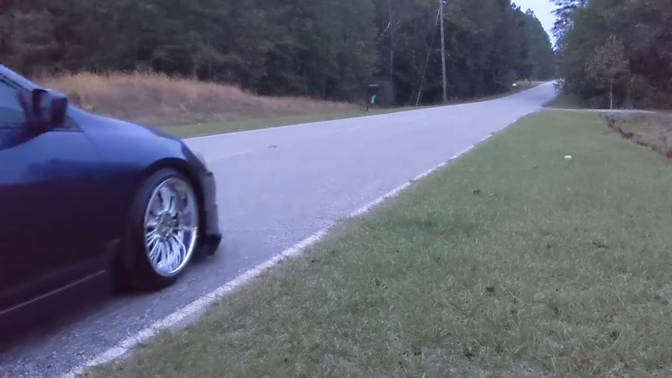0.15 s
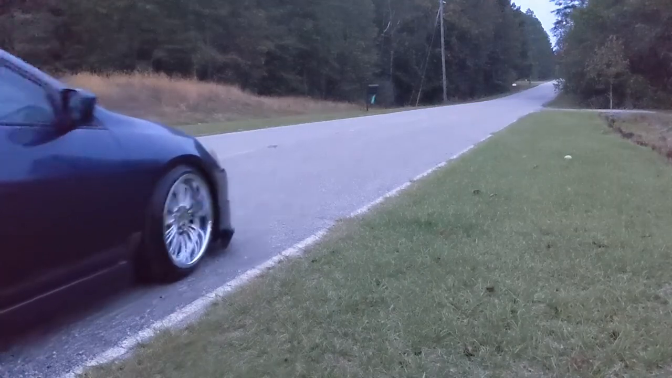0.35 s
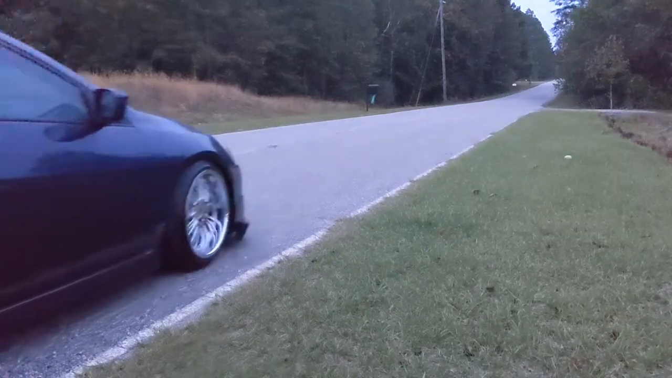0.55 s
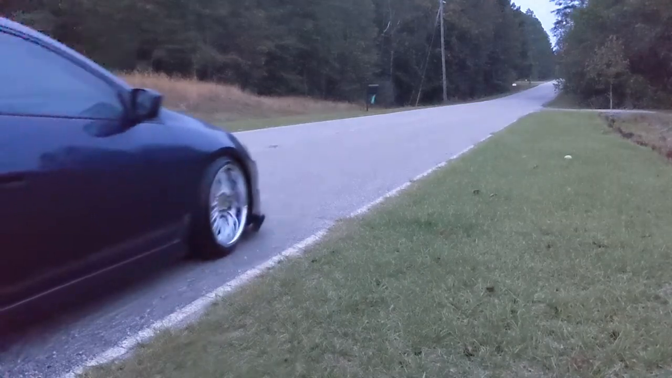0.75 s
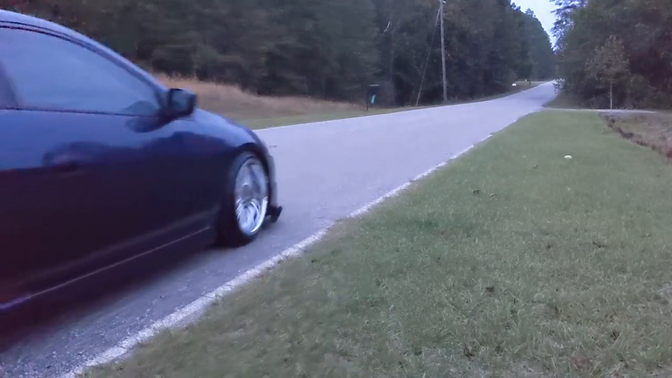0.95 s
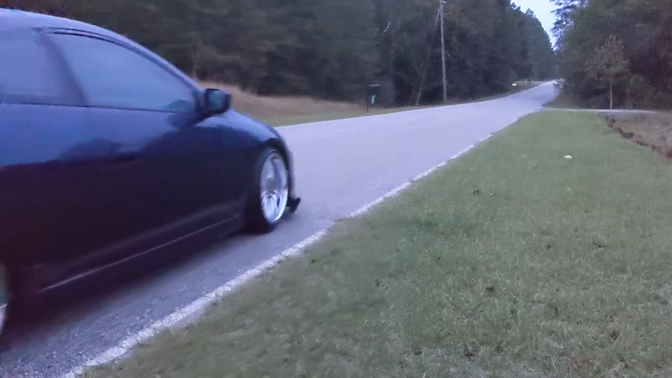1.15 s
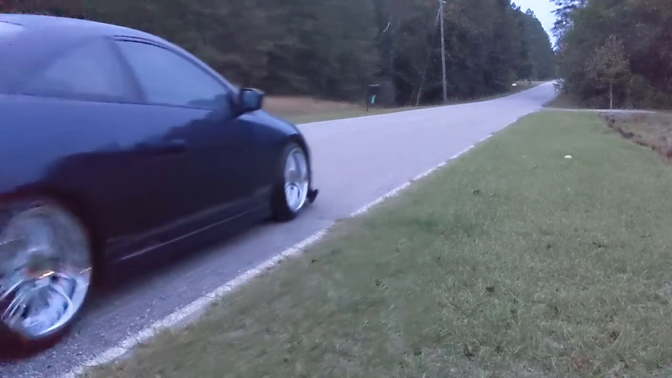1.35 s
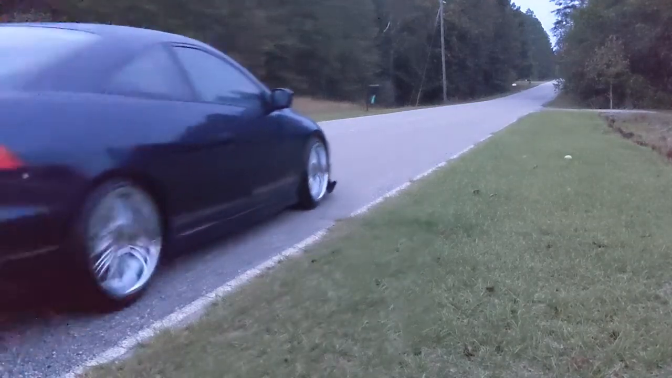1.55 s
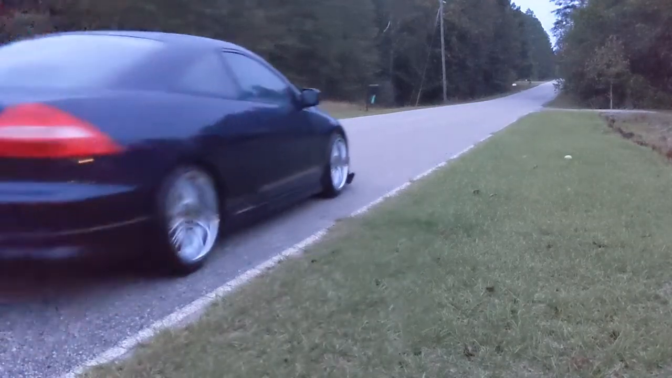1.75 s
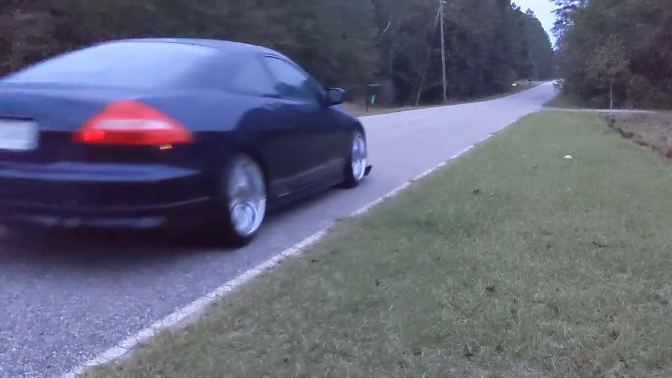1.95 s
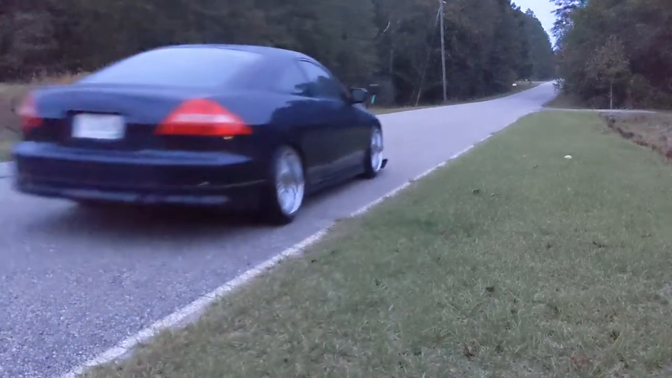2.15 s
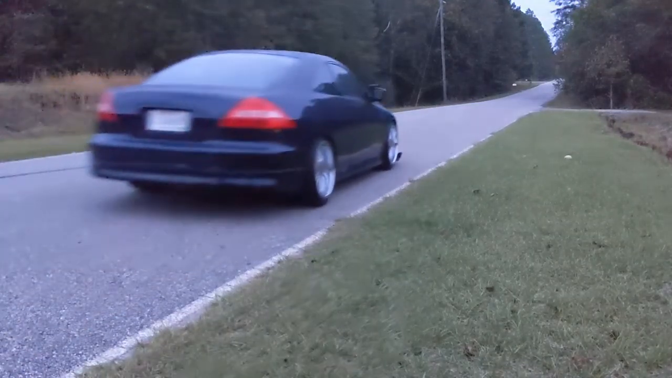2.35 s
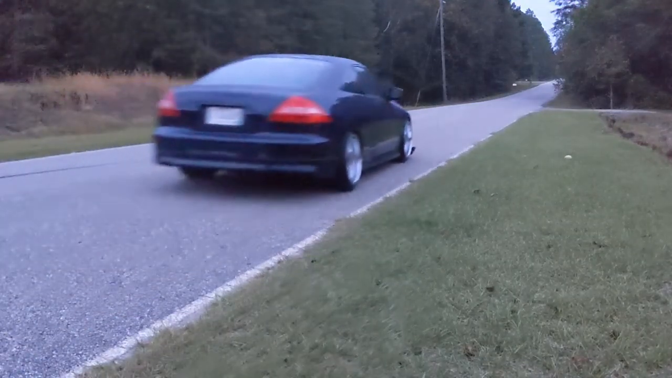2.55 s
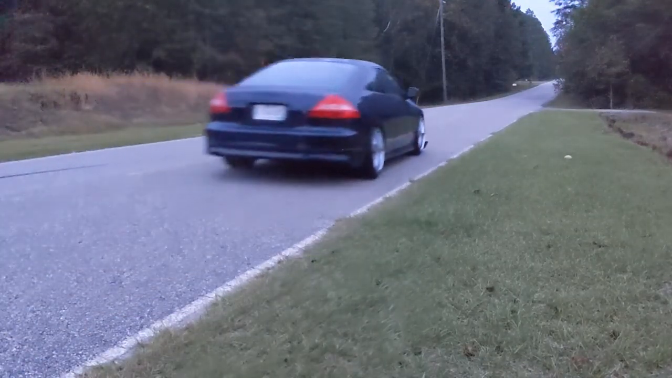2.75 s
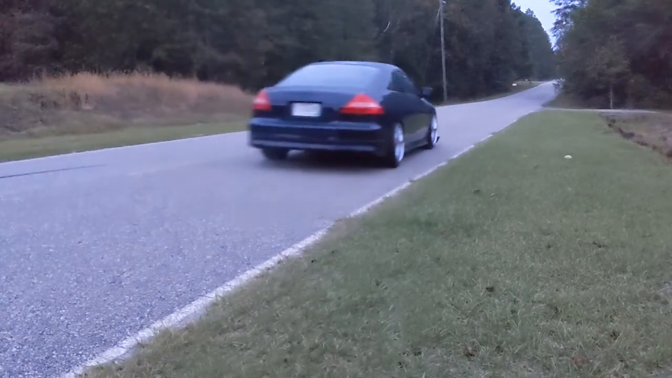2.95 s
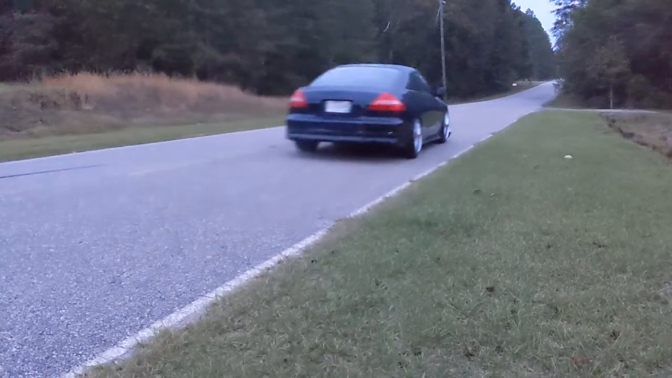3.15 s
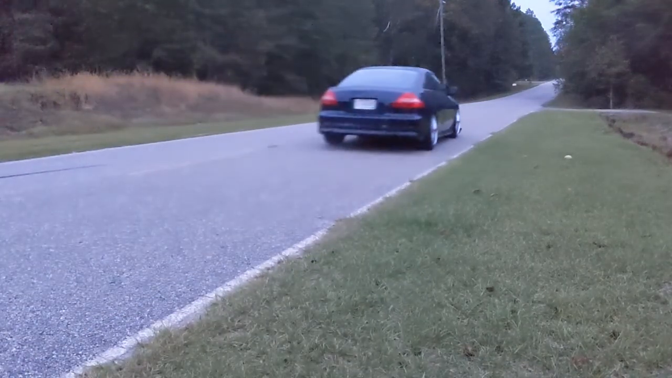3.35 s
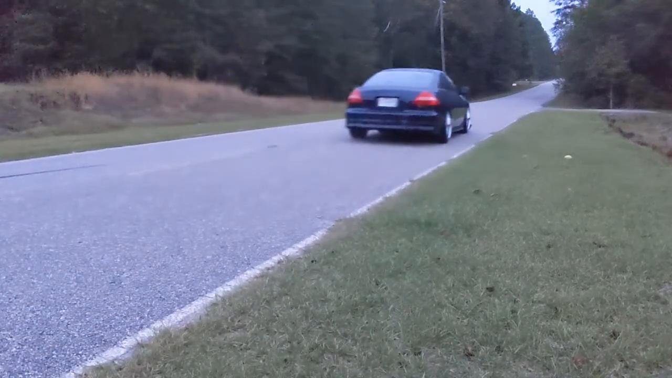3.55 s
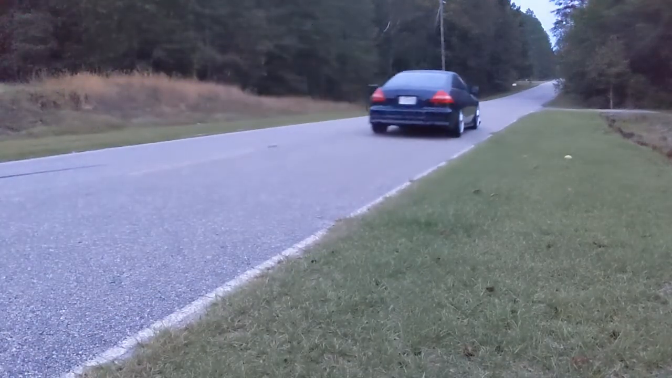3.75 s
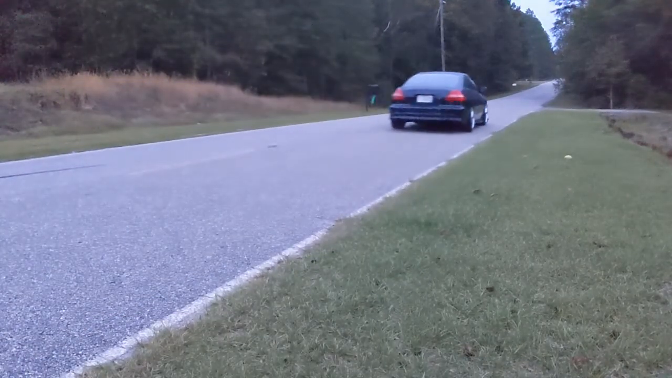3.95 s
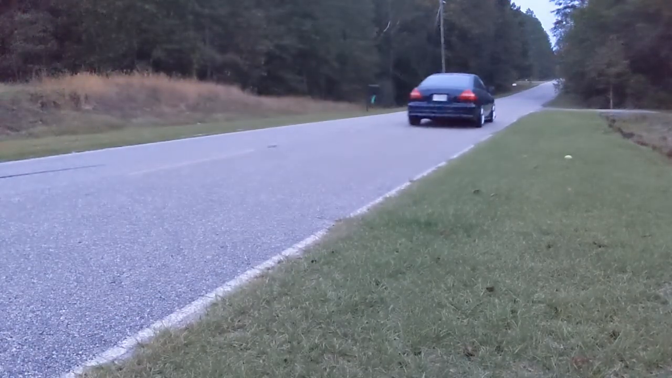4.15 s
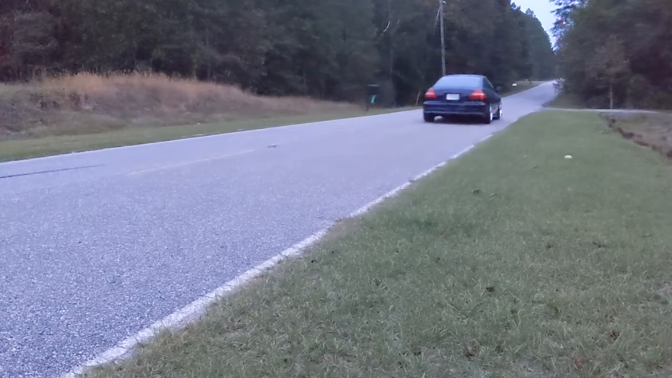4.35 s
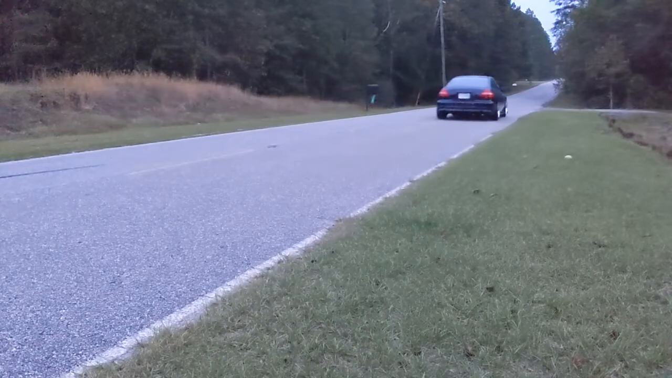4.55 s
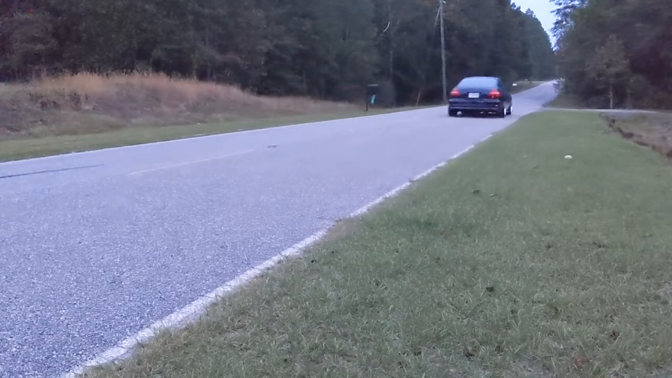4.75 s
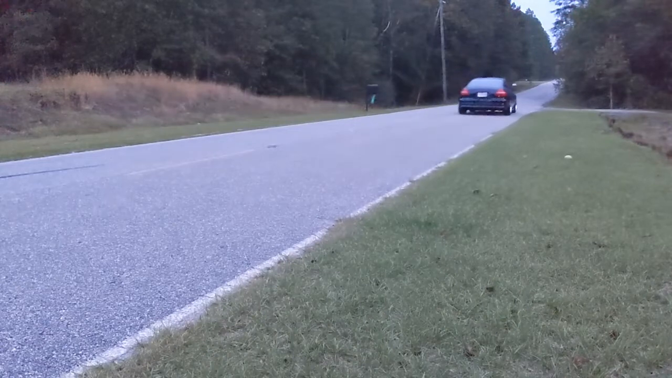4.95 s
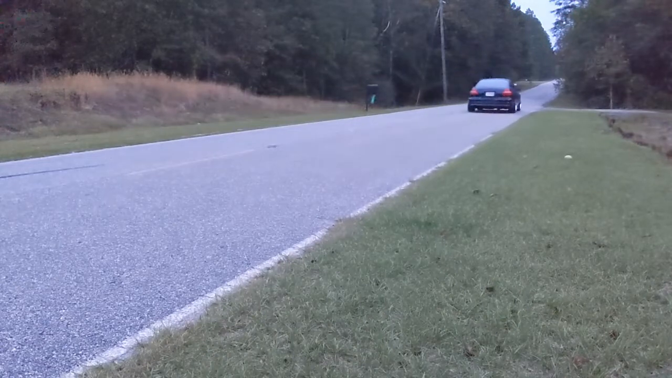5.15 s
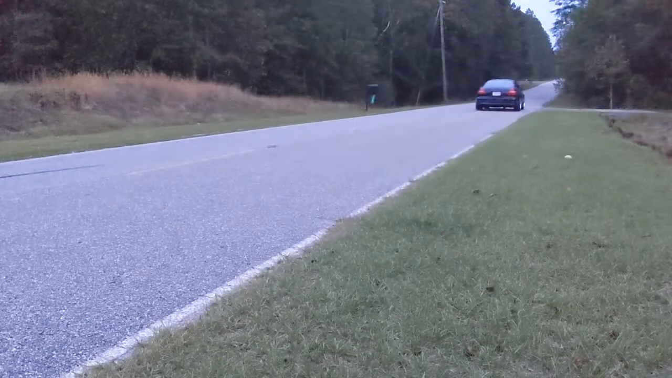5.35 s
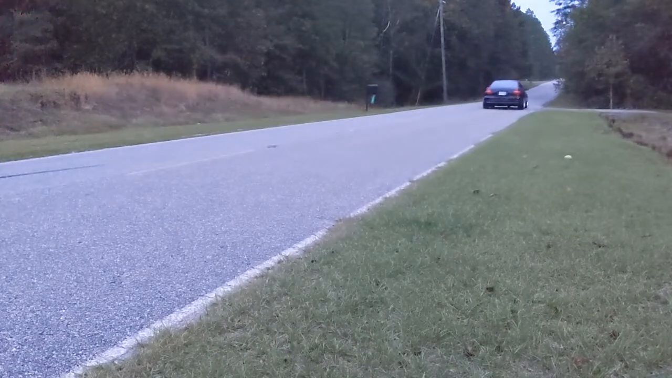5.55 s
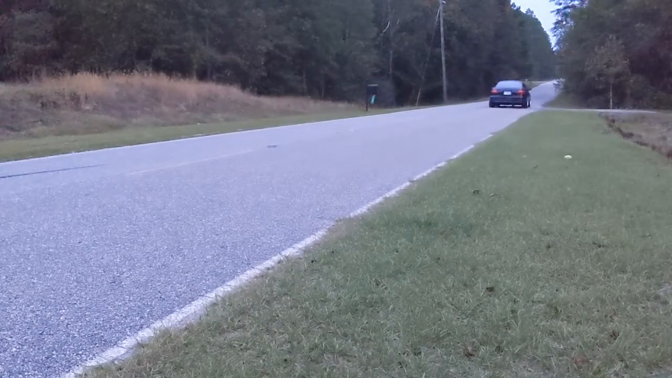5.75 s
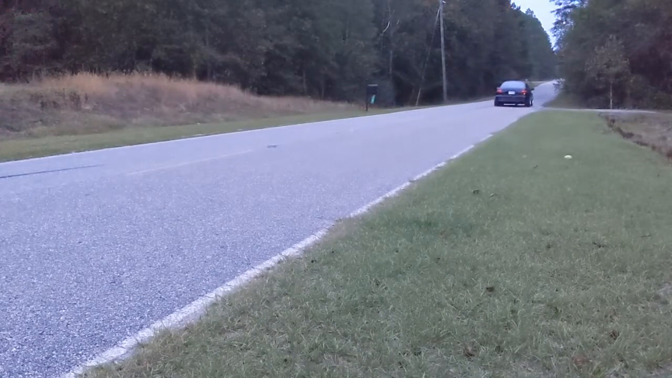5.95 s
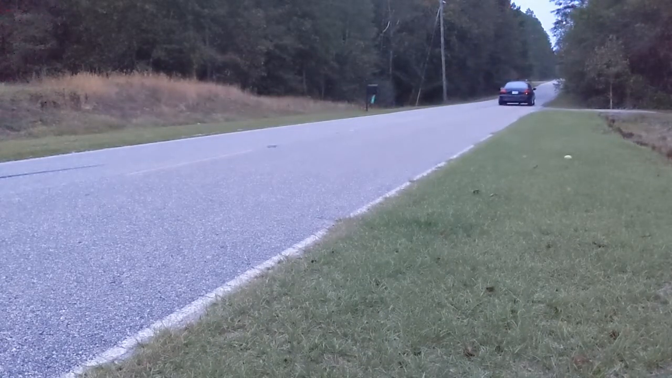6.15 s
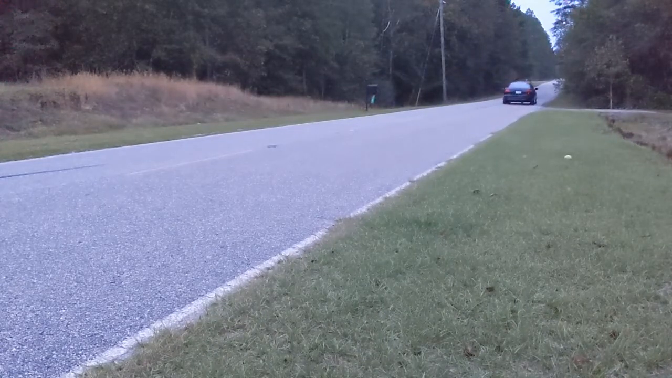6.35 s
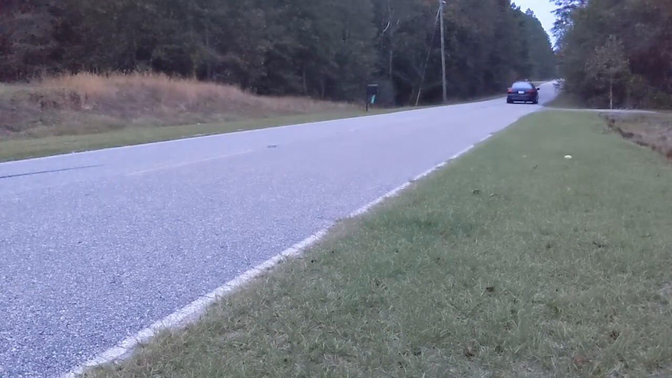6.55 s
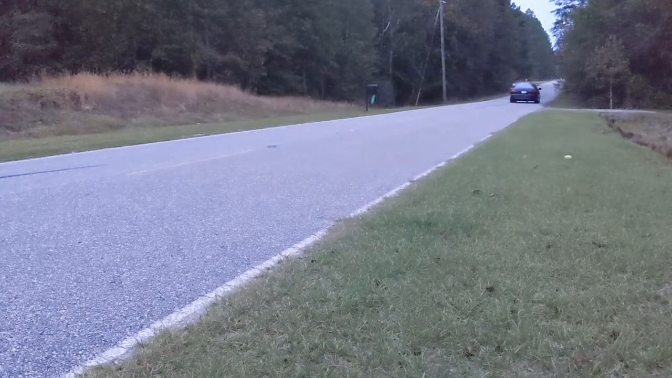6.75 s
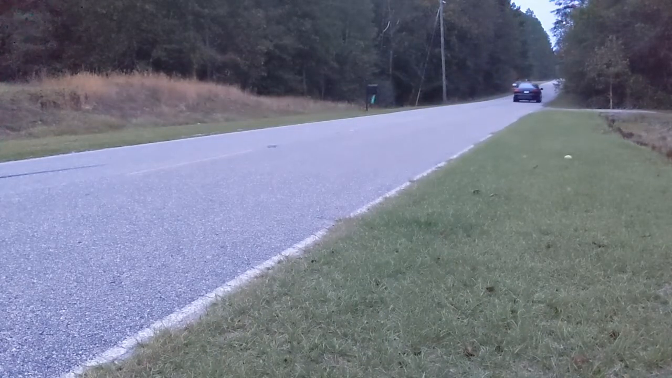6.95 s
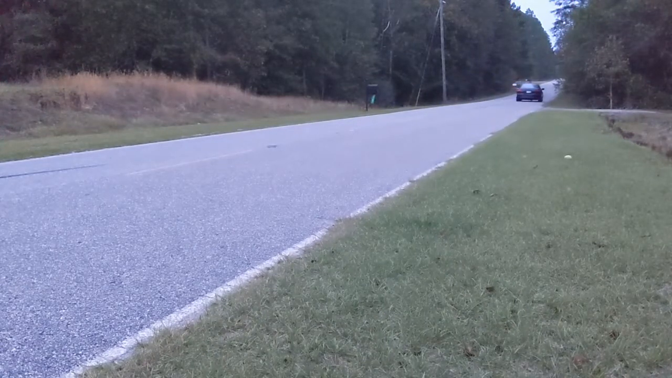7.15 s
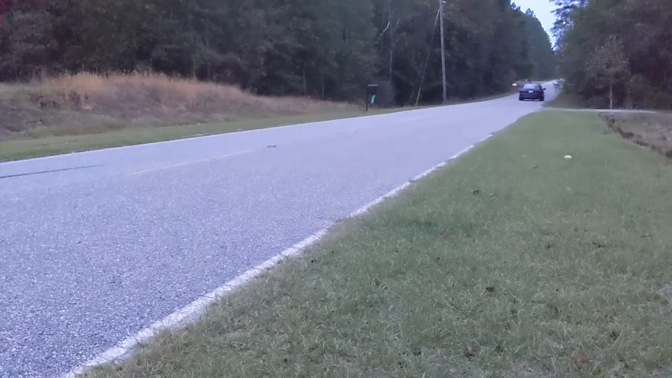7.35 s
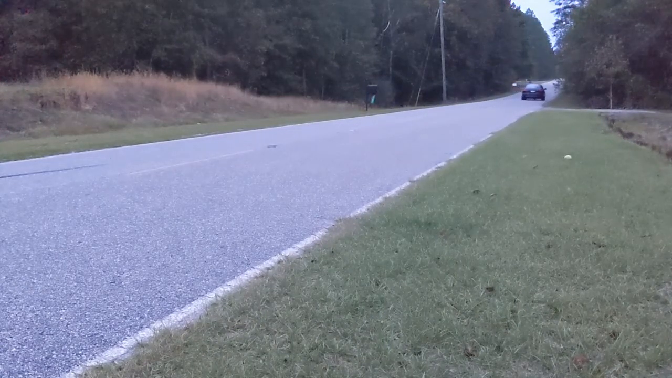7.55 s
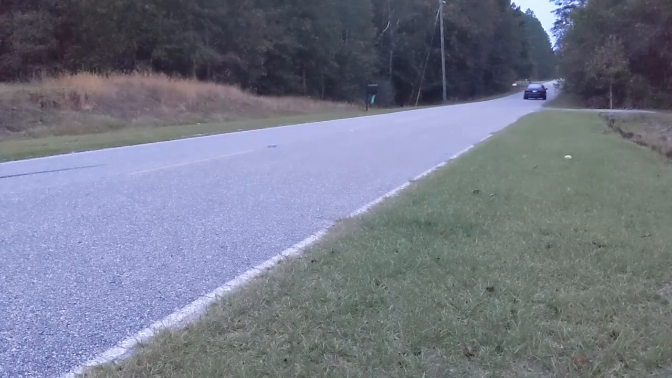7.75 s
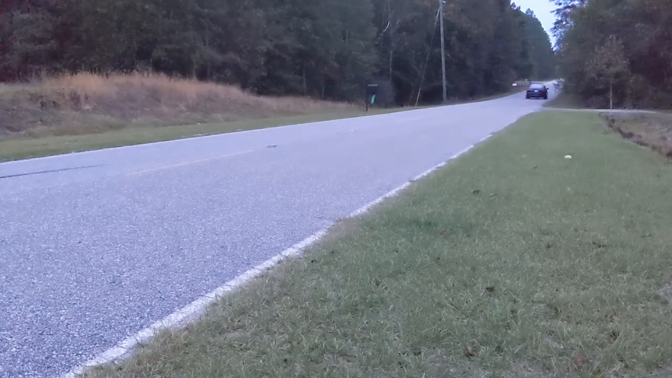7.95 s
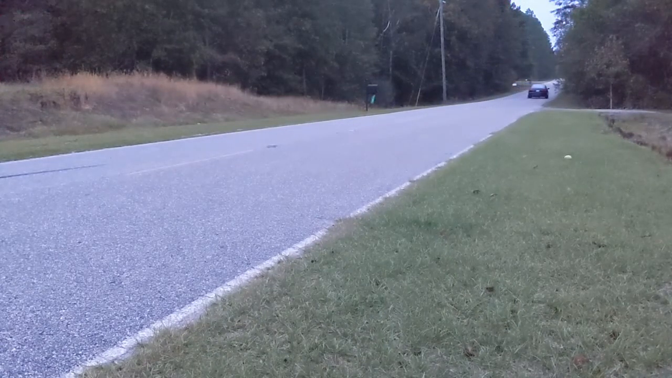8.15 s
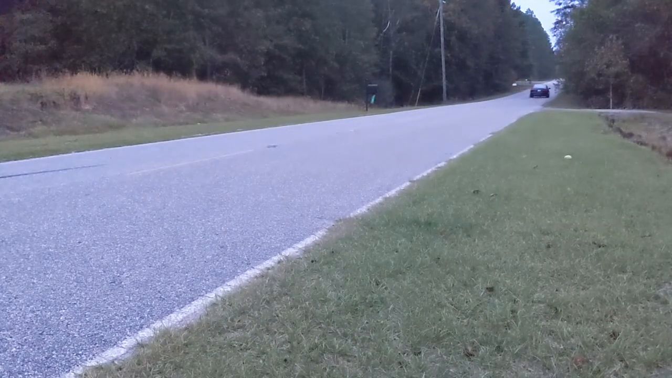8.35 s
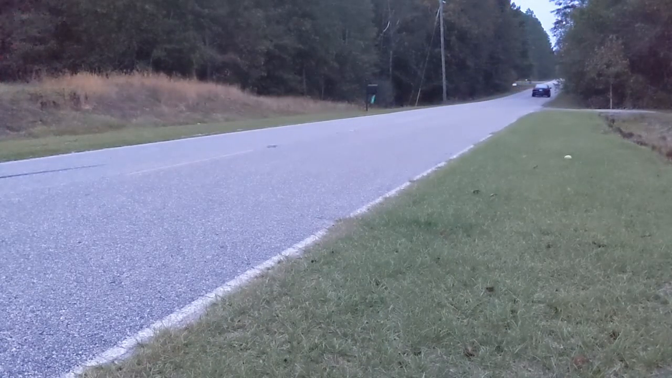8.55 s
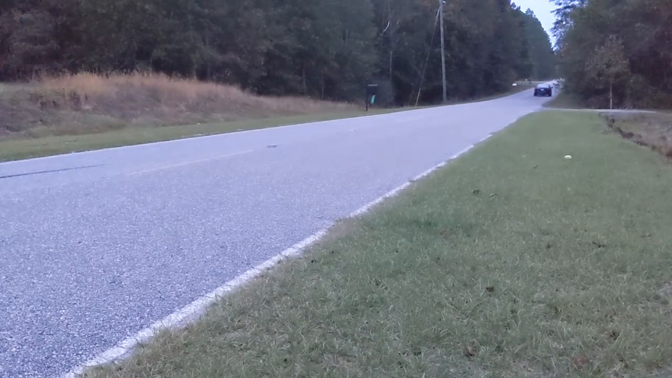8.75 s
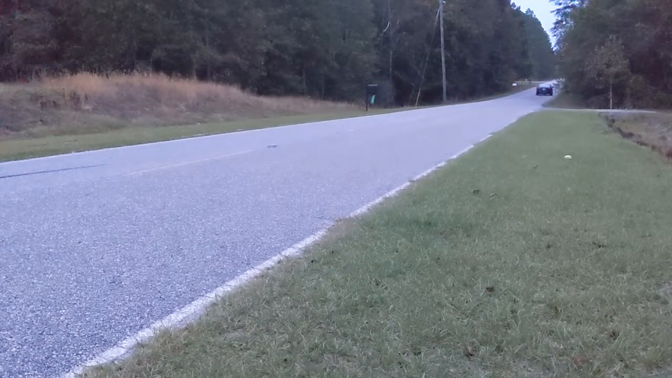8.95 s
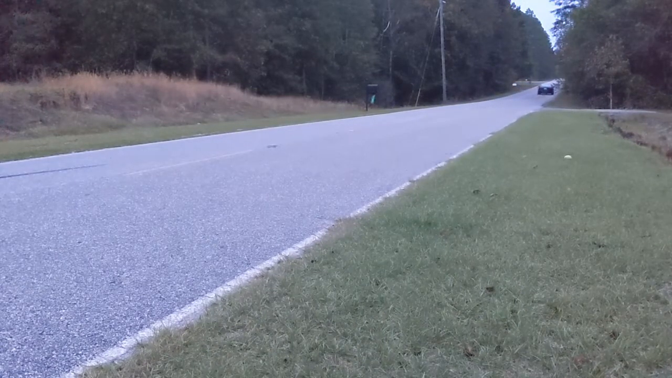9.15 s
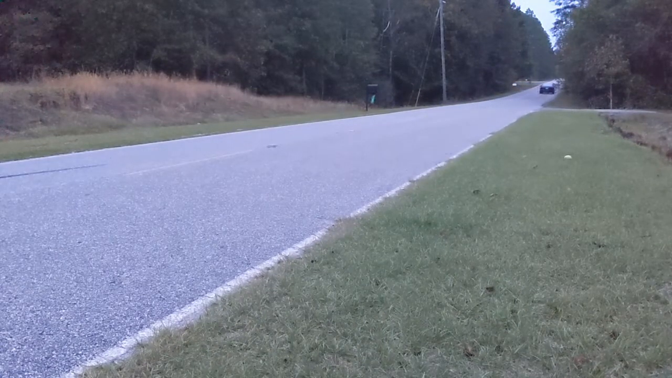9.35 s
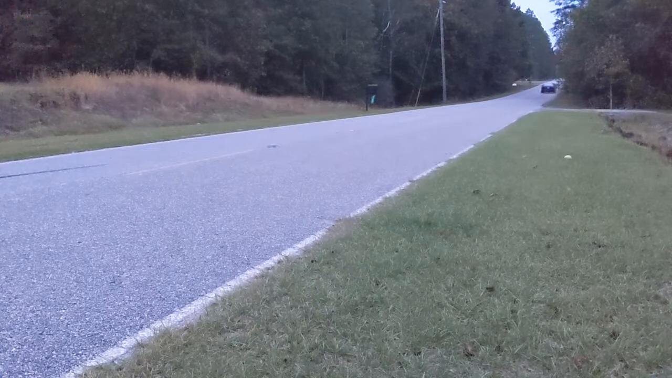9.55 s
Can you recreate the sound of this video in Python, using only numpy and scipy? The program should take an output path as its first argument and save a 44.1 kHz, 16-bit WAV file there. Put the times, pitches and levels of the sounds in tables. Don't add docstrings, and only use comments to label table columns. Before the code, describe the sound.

Close beside the road, a car slips its clutch, accelerates hard from left to ahead, lifts, changes gear and drives off growling.

```python
import sys
import numpy as np
from scipy import signal
from scipy.io import wavfile
from scipy.ndimage import uniform_filter1d, map_coordinates

SR = 44100
rng = np.random.default_rng(int(sys.argv[2]) if len(sys.argv) > 2 else 0)


def generate_wav(signal):
    frames = np.transpose(np.atleast_2d(signal))
    scaled = np.clip(frames, -1, 1) * 32767
    pcm = np.round(scaled).astype(np.int16)
    wavfile.write(sys.argv[1], SR, pcm)


def volts(x):
    e = np.asarray(x, float) / 20
    return 10 ** e


N = 423801
T = np.arange(N) / SR
STEP = 10
SLOW = T[::STEP]

# [t/s, firing rate/Hz, exhaust effort/dB]
REVS = [(0.0, 68.3, -20.0), (0.22, 71.86, -20.5), (0.55, 69.1, -21.5), (1.1, 42.98, -22.5),
        (1.32, 38.5, -20), (1.5, 41.07, -20.5), (2.45, 74.03, -16), (3.05, 97.14, -18),
        (3.45, 120.6, -21.5), (4.28, 161.2, -21.5), (5.2, 207.1, -23.2), (5.73, 229.1, -29),
        (5.99, 221.2, -37.5), (6.47, 190.4, -35.5), (6.6, 146.4, -34.5), (6.88, 169.6, -27.5),
        (7.7, 175.1, -29), (9.61, 237.8, -30)]
# [t/s, level/dB]
JET = [(0, -3.5), (.6, -3.5), (1.3, -6), (2.05, -1.5), (2.6, 2), (4.5, 2.5), (5.5, 2.5), (6.32, 0.5),
       (6.73, -4), (6.81, 1), (6.96, 6.5), (7.08, 2.5), (7.14, -3.5), (7.44, 1), (8.6, 2.5), (9.5, 4),
       (9.61, 4)]


def evened(x):
    return x / np.sqrt(np.mean(x ** 2) + 1e-20)


def read(points, hz):
    f, value = np.transpose(points)
    return np.interp(np.log(hz + 1), np.log(f + 1), value)


def curves(rows, t=T):
    s, *columns = np.transpose(rows)
    return [np.interp(t, s, c) for c in columns]


def bump(x, centre, width, height):
    return height * np.exp(-((x - centre) / width) ** 2)


def wander(per_s, t=SLOW):
    values = rng.standard_normal(int(N / SR * per_s) + 4)
    return evened(map_coordinates(values, [t * per_s], order=3))


def motion(t):
    # [t/s, speed/(m/s)]
    away = [
        (1.5, -2),
        (3, 10.5),
        (5, 21),
        (8, 24.5),
    ]
    speed = np.maximum(curves(away, t)[0], 0)
    return speed, np.log10(1 + np.cumsum(speed) * (t[1] - t[0]) / 3)


def engine():
    # [t/s, half width/s, shift/Hz]
    sags = [
        (1.85, .2, 1.02),
        (3.36, .14, 1.2),
        (6.709, .089, -18),
        (6.961, .038, -8),
        (7.233, .124, -13),
    ]
    hz = curves(REVS, SLOW)[0] + sum(bump(SLOW, *row) for row in sags)
    hz = hz * (1 + .002 * wander(25.0))
    return hz, np.cumsum(hz) * STEP / SR


def muffler_db(heard_hz, speed, decades, beside):
    # [f/Hz, level/dB]
    passed = [(31.5, -18), (65, -22), (109.5, -5), (158.7, -1.5), (315, -4.5), (344, -8.5), (585, -13),
              (1250, -23)]
    # [f/Hz, relative width, level/dB]
    chambers = [(117, 0.11, 2.5), (137, 0.039, 2.5), (215, 0.059, 0.7), (248, 0.023, -3.8),
                (305.7, 0.05, 3), (342, 0.013, -2.5), (414, 0.053, -4), (437.6, 0.022, -6.5),
                (509, 0.02, -6), (580, 0.09, -2.5), (647, 0.038, -14), (730, 0.019, -6.5)]
    # [f/Hz, relative width, level/dB]
    under_car = [(68.5, 0.12, 8), (110.5, 0.11, -5.5), (196.4, 0.04, -23), (206.6, 0.15, 5), (450, 0.23, 2)]
    # [f/Hz, relative width, level/dB]
    notch = (195.7, 0.056, -12)
    speed, decades, beside = speed[::STEP], decades[::STEP], beside[::STEP]
    f = heard_hz[::STEP] * (1 + speed / 343)

    def bell(hz, width, db):
        return bump(np.log(f / hz), 0, width, db)

    db = read(passed, f) + sum(bell(*row) for row in chambers)
    db += beside * sum(bell(*row) for row in under_car)
    db += -30 * np.maximum(np.log2(f / 620), 0) * np.clip((decades - 1) / .3, 0, 1)
    cliff_db = -7 * np.clip((f - 310) / 20, 0, 1)
    db += np.clip(1 - .024 * speed, 0, 1) * (bell(*notch) + cliff_db)
    return np.interp(SLOW, SLOW[::STEP], db)


def exhaust_orders(hz, turns):
    # [f/Hz, level/dB]
    pipe = [(30, -21), (70, -4), (150, -2), (310, 6.5), (350, -13), (480, -13), (560, -26), (900, -25),
            (1400, -34.5)]
    firing_db = [2, -6.5, -9.5, -11.5, -17.5, -22.5]
    cylinder_db = [0, -1.1, -1.1, 0, -1.6, 0, 0, 1.5, -6, 0, -3.7, 0.5]
    # [t/s, half width/s, level/dB]
    lift = [
        (5.83, .15, -9),
        (6.3, .2, 6),
    ]
    # [t/s, half width/s, level/dB]
    nulls = [
        (6.02, .035, -24),
        (6.51, .02, -5),
    ]
    effort_db = curves(REVS, SLOW)[1]
    speed, decades = motion(SLOW)
    beside = np.clip((1.8 - SLOW) / .3, 0, 1)
    uneven_db = -45 + .1 * (effort_db + 24) - 5 * decades - 7 * np.clip((1.9 - SLOW) / .3, 0, 1)
    bank_db = -4.0 * np.clip((70 - hz) / 25, 0, 1) - .49 * (effort_db + 24)
    out = np.zeros(len(SLOW))
    for sixth in range(3, 85):
        k = sixth / 6
        f = k * hz
        if sixth % 6 == 0:
            db = effort_db + muffler_db(f, speed, decades, beside)
            db += firing_db[min(sixth // 6, 6) - 1] - 2.5 * max(k - 6, 0)
            thin = np.minimum((f - 430) / 60, 1 - (k > 4.5) * (f - 640) / 150)
            db += -5.5 * (k > 3.5) * (1 - beside) * np.clip(thin, 0, 1)
            blur = np.clip((f - 420) / 150, 0, 1) * np.clip((130 - hz) / 40, 0, 1)
            start = np.pi + 1.1 - .9 * (f / 330) ** 2 + .6 * blur * wander(20.0)
            start += (bump(f, 215, 40, 1.3) - 1.8) * beside
        elif sixth > 45 or sixth > 11 and sixth % 3:
            continue
        else:
            if sixth in (3, 9):
                db = effort_db + muffler_db(f, speed, decades, beside) + bank_db
                db += -18 + sum(bump(SLOW, *row) for row in lift) if sixth == 3 else -22
            elif sixth % 3 == 0:
                db = uneven_db + read(pipe, f) + 3.0 - 0.82 * k
            else:
                db = uneven_db + read(pipe, f) + cylinder_db[sixth] - 13.5 * abs(np.log2(k / 0.95))
            start = 2 * np.pi * rng.random() + .4 * wander(3.0) + .12 * k * wander(16.0)
        flutter_db = 3.0
        if sixth in (6, 12, 18, 24):
            flutter_db = .4
        elif sixth in (3, 9, 30, 36, 42, 48):
            flutter_db = 1.2
        breaks_up = (f > 480) & (sixth in (18, 24, 30, 36))
        flutter_db = np.where(breaks_up, 2.5, flutter_db) * wander(7.0)
        tone = np.cos(2 * np.pi * k * turns + start) * (f < 1500)
        out += np.sqrt(2) * volts(db + flutter_db) * tone
    out *= volts(sum(bump(SLOW, *row) for row in nulls))
    return signal.resample_poly(out, STEP, 1, window=("kaiser", 10), padtype="reflect")[:N]


def noise(near, far, patchy_db, gone=((3.0, 0), (7.2, 1)), size=1024):
    # [f/Hz, likeness]
    likeness = [(100, 0.83), (600, 0.76), (1200, 0.75), (2500, 0.72), (5000, 0.36), (10000, 0.074)]
    frames, hz = 4 * N // size + 5, np.fft.rfftfreq(size, 1 / SR)
    a, b, c, d, patches = rng.standard_normal((frames, len(hz), 5), dtype=np.float32).T
    patches = uniform_filter1d(patches, size=10, axis=0)
    patches = evened(uniform_filter1d(patches, size=10, axis=1))
    share = np.clip(curves(gone, np.arange(frames) * size / 4 / SR)[0], 0, 1)
    colour = volts(np.outer(read(near, hz), 1 - share) + np.outer(read(far, hz), share))
    colour /= np.sqrt((colour ** 2).mean(0))
    same = np.clip(read(likeness, hz), 0, 1)[:, None]
    left = a + 1j * b
    right = same * left + np.sqrt(1 - same ** 2) * (c + 1j * d)
    z = np.array([left, right]) * colour * volts(patchy_db * patches)
    return evened(signal.istft(z, nperseg=size, noverlap=3 * size // 4)[1][:, :N])


def rasp(turns, jet_db):
    # [f/Hz, density/(dB per Hz)]
    aimed = [(850, -33), (1450, -7), (1660, -7.5), (1970, -1.5), (2130, 0), (2620, 0), (4500, -10.5),
             (5850, -48.5), (9900, -120)]
    # [f/Hz, density/(dB per Hz)]
    blurred = [(850, -21.5), (1450, -3), (1900, -6.5), (2440, -4), (3530, -10), (4500, -16.5), (5850, -47),
               (9900, -120)]
    strength = volts(3.9 * np.minimum(rng.exponential(1, 3000), 4))[turns.astype(int)]
    puffs = evened(strength * np.exp(-(turns % 1) / 0.26))
    pulsed = np.interp(T, [0, 1.3, 1.6, 2.6, 4.0, 9.6], [0.18, 0.17, 0.2, 0.46, 0.11, 0.1])
    aim = ((1.3, 0.62), (2.2, 0.52), (4.4, 0), (5.8, 1))  # (t/s, share of blurred colour)
    jet = noise(aimed, blurred, 1.5, aim, size=512)
    puffing = (1 - pulsed + pulsed * puffs) / np.sqrt(1 - pulsed + pulsed ** 2)
    return volts(-59 + jet_db) * jet * puffing


def rattles(turns):
    # [from t/s, to t/s, f/Hz, width/Hz, level/dB]
    parts = [(1.405, 2.192, 1700, 200, -63), (2.125, 2.288, 2000, 90, -60.5), (2.259, 2.615, 2030, 90, -58),
             (2.301, 2.9, 2624, 70, -64), (2.612, 4.099, 2250, 79.2, -68.5), (2.8, 3.595, 2470, 110, -60),
             (3.301, 4.402, 2737, 90, -62.5), (3.4, 4.605, 2950, 110, -64.5),
             (3.1, 4.31, 3750, 120.5, -64.5), (4.493, 5.498, 2002, 90.7, -63.5),
             (6.828, 7.038, 2456, 69.6, -63)]
    fired = np.flatnonzero(np.diff(np.floor(turns + .7)))
    ring, out = np.arange(1500) / SR, np.zeros(N)
    for start, end, hz, width, db in parts:
        a, b = round(start * SR), round(end * SR)
        knocks = 0.033 * rng.standard_normal(b - a)
        inside = fired[(fired > a) & (fired < b)]
        knocks[inside - a] += volts(3.6 * np.minimum(rng.exponential(1, len(inside)), 3.5))
        decay = np.sin(2 * np.pi * hz * ring) * np.exp(-np.pi * width * ring)
        rung = signal.fftconvolve(knocks, decay)[:b - a]
        out[a:b] += volts(db) * evened(rung) * signal.windows.tukey(b - a, .5)
    return out


def gas_flow(jet_db):
    # [f/Hz, density/(dB per Hz)]
    flow_near = [(25, -27.5), (60, -10), (150, -7), (310, -5), (350, -3), (470, 0), (540, -14.5),
                 (650, -38), (1500, -92.5)]
    # [f/Hz, density/(dB per Hz)]
    flow_far = [(25, -12), (60, -8.5), (120, -4.5), (300, -5.5), (480, -10.5), (600, -23.5), (1500, -88.5)]
    free_hz = np.maximum(curves(REVS)[0] - 42, 0) * np.clip((1.4 - T) / .3, 0, 1)
    return volts(-53 + .2 * jet_db + 0.4185 * free_hz) * noise(flow_near, flow_far, 2.6, size=2048)


def tyre_roar(jet_db, speed):
    # [f/Hz, density/(dB per Hz)]
    roar_near = [(360, -36.5), (620, -9), (707, -5.5), (899, -14.5), (1150, -9), (1700, -18), (2210, -54.5),
                 (3740, -120)]
    # [f/Hz, density/(dB per Hz)]
    roar_far = [(330, -26.5), (560, 1.5), (600, -10), (710, -3.5), (978, -2), (1340, -5), (1700, -14),
                (2210, -39), (3740, -120)]
    roar = noise(roar_near, roar_far, 1.6, ((1.0, 0.16), (3.0, 0.95)))
    return volts(-60 + 0.41 * jet_db + 0.1566 * speed) * roar


def engine_hiss(jet_db, decades):
    # [f/Hz, density/(dB per Hz)]
    hiss_near = [(2530, -24.5), (4300, -0.5), (6020, -3.5), (7350, -10.5), (9660, -4), (11300, -5.5),
                 (12600, -11), (13800, -20.5)]
    # [f/Hz, density/(dB per Hz)]
    hiss_far = [(2530, -30), (4300, -4.5), (5100, -6), (6260, -6.5), (8590, -13.5), (10600, -13.5),
                (12500, -26.5), (16200, -54), (22000, -120)]
    hiss_db = -58 + .7 * jet_db - 11 * decades + .9 * wander(12.0, T)
    hiss_db += 0.0409 * (curves(REVS)[0] - 100)
    return volts(hiss_db) * noise(hiss_near, hiss_far, 1.6, size=512)


def ticks():
    # [t/s, peak level/dB, f/Hz]
    snaps = [(1.0988, -45.5, 2730), (1.457, -46, 1660), (1.5542, -46, 1670), (1.7255, -46, 1736),
             (1.8405, -41.5, 1690), (1.8757, -47, 2033), (2.1505, -48, 2020), (2.3012, -48, 2000),
             (2.3156, -49, 1960), (2.386, -58, 2020), (2.4134, -58, 2030), (2.4404, -51, 2147),
             (2.4688, -55, 2040), (3.4381, -43, 2260), (6.9524, -46, 1680), (6.9664, -51, 1655),
             (1.9345, -49, 4790), (2.0544, -47, 4970), (2.8963, -45, 4320), (3.9204, -53, 4070),
             (6.2397, -46, 4440)]
    out, t = np.zeros(N), np.arange(500) / SR
    for s, db, hz in snaps:
        crack = .45 * rng.standard_normal(500) * np.exp(-t / .001)
        ring = np.sin(2 * np.pi * hz * t) * np.exp(-t * np.sqrt(hz) / .09)
        out[round(s * SR):][:500] += volts(db + 2.5) * (ring + crack)
    return out


def trees(exhaust, decades):
    length = SR // 2
    taps = np.zeros((2, length))
    at = np.arange(1800, length - 40, 40) + rng.integers(0, 40, (length - 1801) // 40)
    taps[:, at] = rng.choice([-1., 1.], len(at)) + 0.75 * rng.standard_normal((2, len(at)))
    taps *= volts(-60 * np.arange(length) / SR / 0.83)
    echo = signal.fftconvolve(exhaust[None], taps / np.linalg.norm(taps[0]), axes=1)[:, :N]
    return volts(-18 - 9 * np.clip(1 - decades / 0.42, 0, 1)) * echo


def close_pair(car):
    lag = 5.74 * np.tanh((T - 2.6) / 2.22)
    left = map_coordinates(car[0], [np.arange(N) - lag], order=3, mode="nearest")
    return np.array([left * volts(1.15), car[1] * volts(-0.01)])


def scene():
    hz, turns = engine()
    turns_now = np.interp(T, SLOW, turns)
    jet_db, = curves(JET)
    speed, decades = [np.interp(T, SLOW, c) for c in motion(SLOW)]
    exhaust = exhaust_orders(hz, turns)
    car = exhaust + rasp(turns_now, jet_db) + rattles(turns_now)
    car += gas_flow(jet_db) + tyre_roar(jet_db, speed) + engine_hiss(jet_db, decades)
    car += ticks() + trees(exhaust, decades)
    return close_pair(car) * np.minimum(T / 0.0024, 1)


def roll_off(x):
    return signal.sosfilt(signal.butter(12, 16510, fs=SR, output="sos"), x)


def record(dry):
    dropout_s, lost, click = 5.6395, 54, .043
    dull = signal.oaconvolve(dry, signal.firwin(41, 14600, fs=SR)[None], "same")
    near = round(dropout_s * SR) - 100
    jump = dull[0, near + lost:][:200] - dull[0, near:near + 200]
    cut = near + np.argmin(abs(jump - click))
    tail = dull[:, :-lost - 1:-1]
    mix = np.concatenate([dull[:, :cut], dull[:, cut + lost:], tail], axis=1)
    return roll_off(mix)


dry = scene()
out = record(dry)
generate_wav(out)
```